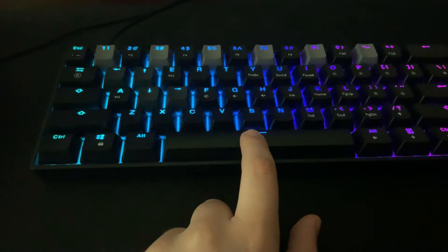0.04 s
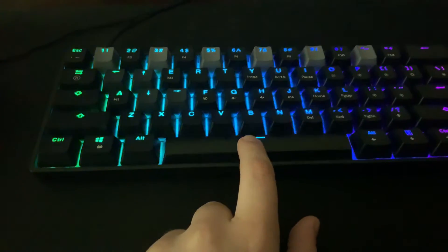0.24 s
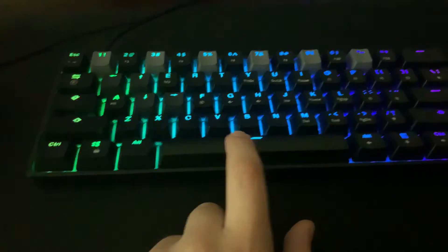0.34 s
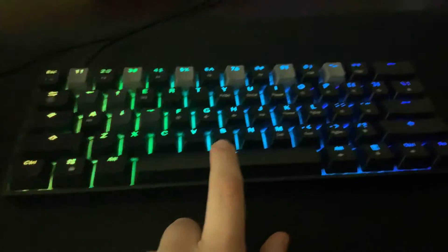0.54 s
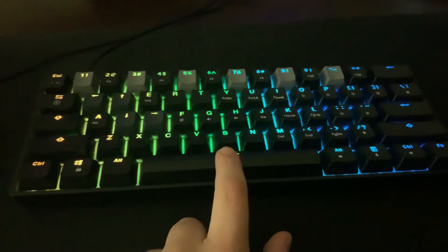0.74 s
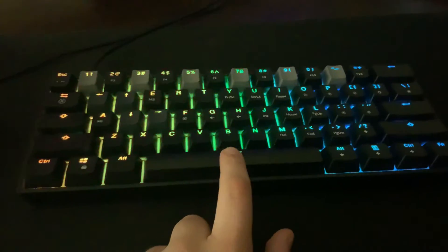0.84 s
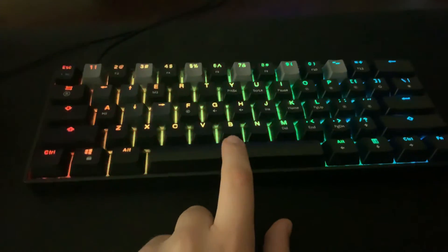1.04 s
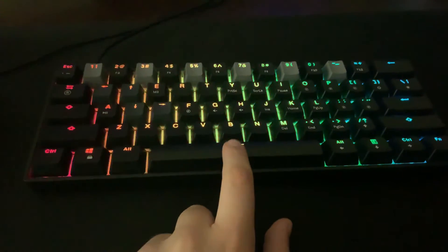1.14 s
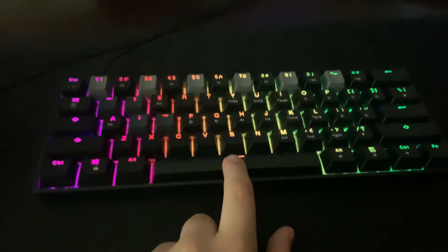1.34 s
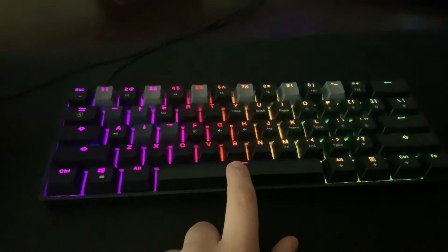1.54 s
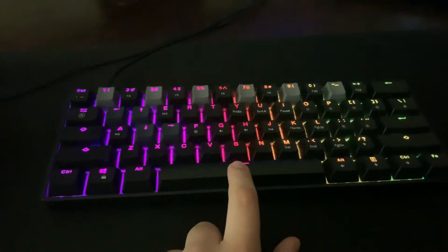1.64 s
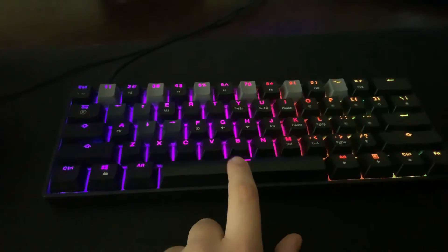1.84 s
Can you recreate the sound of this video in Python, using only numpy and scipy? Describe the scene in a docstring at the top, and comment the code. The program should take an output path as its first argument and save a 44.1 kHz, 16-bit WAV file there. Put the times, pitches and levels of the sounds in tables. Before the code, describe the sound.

Mechanical keyboard spacebar pressed and released twice, with sharp plastic clacks in a small room.

```python
"""The spacebar of a mechanical keyboard is pressed and let go twice, just after an earlier release.
Its stem slides faintly, then the plastic bar clacks against a stop and its steadying wire rattles.
The desk thumps underneath, and a small room with soft fan air and a low hum answers.
Between the two strokes comes a faint rustle."""
import sys
import numpy as np
from scipy import signal
from scipy.fft import rfft, irfft, next_fast_len
from scipy.io import wavfile
from scipy.ndimage import map_coordinates

SR = 44100
rng = np.random.default_rng(int(sys.argv[2]) if len(sys.argv) > 2 else 0)


def wrap_up_sound(samples):
    """Save the sound to the file named by the first command line argument, as 16-bit audio."""
    columns = np.atleast_2d(samples).T
    # keep every value between -1 and 1, then stretch to whole-number steps
    tamed = np.clip(columns, -1, 1)
    steps = np.round(tamed * 32767).astype(np.int16)
    wavfile.write(sys.argv[1], SR, steps)


N = 83790
LEAD_S = .1  # tracks start this early, so a sound before time 0 can ring on into the scene


def amp(db):
    return 10 ** (np.asarray(db) / 20)


def unit(x):
    return x / np.sqrt(np.mean(x ** 2) + 1e-20)


def along(points, hz):
    """Read between the rows of a (frequency, value) table, on a log frequency scale."""
    freqs, values = np.transpose(points)
    return np.interp(np.log(hz + 1), np.log(freqs + 1), values)


def filtered(x, gain):
    """Scale each frequency in x by gain(hz)."""
    size = next_fast_len(len(x) + SR // 4)
    return irfft(rfft(x, size) * gain(np.fft.rfftfreq(size, 1 / SR)), size)[:len(x)]


def noise(colour, size):
    """Noise of strength 1; its colour says how strong the frequencies are next to each other."""
    return unit(filtered(rng.standard_normal(size), lambda hz: amp(along(colour, hz))))


def fading_noise(colour, fades):
    """Half a second of noise; each frequency has its own fade, the time it takes to drop 60 dB."""
    hz, t, spectrum = signal.stft(noise(colour, SR // 2), SR, nperseg=128)
    spectrum = spectrum * amp(-60 * t / along(fades, hz)[:, None])
    return signal.istft(spectrum, SR, nperseg=128)[1][:SR // 2]


def ring(hz, fade_s, t):
    """One fading tone."""
    return np.sin(2 * np.pi * hz * t) * amp(-60 * t / fade_s)


def add(track, start, sound):
    """Mix a sound in at a start time in seconds."""
    part = track[round((start + LEAD_S) * SR):][:len(sound)]
    part += sound[:len(part)]


# how long the plastic clacks: f/Hz, fade t/s
CLACK_FADES = [(600, 0.055), (2000, 0.042), (5000, 0.062), (14000, 0.037)]
# colour of the click: f/Hz, level/dB
CLICK_COLOUR = [(500, -45), (2000, 22), (4500, 8.5), (6500, 0), (10000, 6), (12500, 2), (14700, 10.5),
                (16000, -3.5)]

def contact(colour, clack_db, click_db, t):
    """Hard parts meet: a sharp click, then the short clack of the plastic."""
    clack_rise_s, click_rise_s, click_fade_s = .0003, .0015, .0039
    clack = fading_noise(colour, CLACK_FADES) * (1 - np.exp(-t / clack_rise_s))
    click = noise(CLICK_COLOUR, len(t)) * np.minimum(t / click_rise_s, 1)
    click *= amp(-60 * np.maximum(t - click_rise_s, 0) / click_fade_s)
    return amp(clack_db) * clack + amp(click_db) * click


# the bar hits the bottom: t/s, clack level/dB, ring level/dB, click level/dB, brightness/dB per octave
PRESSES = [(.2027, -28, -33, -27, -1.5), (1.3037, -32, -36, -31.5, -3)]
# the bar springs back up and may bounce: same columns
RELEASES = [(-.023, -23.5, -32, -24, 0.5), (.3065, -23, -27.5, -25.5, 0), (.3188, -23, -31, -27, 2),
            (1.4507, -31, -34.5, -32.5, 0.5)]
# colour of the clack going down and coming up: f/Hz, level/dB
PRESS_COLOUR = [(200, -35), (470, -24.5), (570, -3), (1000, 2), (1700, 4), (2250, -12), (3400, -1.5),
                (3900, -16.5), (4450, -9), (6500, -21.5), (10000, -15.5), (12500, -22), (14800, -12.5),
                (16000, -19)]
RELEASE_COLOUR = [(200, 8.5), (470, -31), (560, 0.5), (1000, 6), (1700, 3), (2400, 0), (3450, -4.5),
                  (3800, -12.5), (6500, -16), (10000, -20), (12500, -21), (14800, -19), (16000, -10.5)]
# tones of the bar and case: f/Hz, press level/dB, release level/dB
BAR_TONES = [(578, -2, -2.5), (649, 2.5, 3.5), (789, -3, -13), (892, -13, -18.5), (984, -2, -5.5),
             (1150, -4, -11), (1430, -6, -2), (1549, -2.5, -7.5), (1658, -3, -2), (1824, -8, -4.5),
             (2275, -1, -4.5), (2739, -4, -5), (3002, -2, -11), (3347, -2.5, -8)]
# how long they ring: f/Hz, fade t/s
BAR_FADES = [(600, .038), (1000, .05), (1600, .058), (3400, .045)]

def bar_hits(t):
    """The bar hits its bottom or top stop; both set the same tones ringing, in a different mix."""
    track = np.zeros(N + SR)
    rise = 1 - np.exp(-t / .0005)
    for side, (hits, colour) in enumerate([(PRESSES, PRESS_COLOUR), (RELEASES, RELEASE_COLOUR)]):
        for start, clack_db, ring_db, click_db, brightness in hits:
            tones = np.zeros(len(t))
            for hz, *levels in BAR_TONES:
                gain = amp(levels[side] + brightness * np.log2(hz / 1000))
                tones += rng.choice([-1, 1]) * gain * ring(hz, along(BAR_FADES, hz), t)
            add(track, start, contact(colour, clack_db, click_db, t) + amp(ring_db) * tones * rise)
    return track


# colour of the room's echo: f/Hz, level/dB
ECHO_COLOUR = [(300, 8), (630, -7), (1000, -1), (1600, 1), (3000, -4), (7000, -3.5), (11000, -3),
               (15000, -0.5)]
# how long it lasts: f/Hz, fade t/s
ECHO_FADES = [(200, .4), (500, 0.5), (1000, 0.26), (3000, 0.3), (7000, 0.24), (15000, 0.25)]

def room_echo(sound, t):
    """The walls of a small room smear a sound into a short tail."""
    rise = 1 - np.exp(-(t / .0017) ** 2)
    tail = fading_noise(ECHO_COLOUR, ECHO_FADES) * rise
    return signal.fftconvolve(sound, tail / np.linalg.norm(tail))[:len(sound)]


# each press or release shakes the desk: t/s, thump level/dB, room boom level/dB
THUMPS = [(-.018, -37.5, -52.5), (0.203, -45.5, -53.5), (0.311, -36.5, -50), (1.303, -50, -55.5),
          (1.454, -39.5, -56)]
# tones of the desk: f/Hz, relative level/dB, fade t/s
DESK_TONES = [(89.5, 6.5, 0.071), (99.14, -13, 0.18)]
# colour of the rumble: f/Hz, level/dB
RUMBLE_COLOUR = [(60, -39), (110, -3), (155, -3.5), (210, -4.5), (325, -7.5), (400, -17), (500, -17),
                 (700, -40)]
# how long it lasts: f/Hz, fade t/s
RUMBLE_FADES = [(100, 0.54), (330, 0.31)]

def desk_thumps(t):
    """The case knocks on the desk, which swells into a thump; a room boom and a low rumble follow."""
    track = np.zeros(N + SR)
    desk_rise_s, boom_rise_s = .035, .09
    knock = amp(-18) * ring(hz=322, fade_s=.24, t=t)
    swell = 1 - np.exp(-(t / desk_rise_s) ** 3)
    thump = sum(amp(db) * ring(hz, fade_s, t) for hz, db, fade_s in DESK_TONES) * swell
    thump /= abs(thump).max()
    boom = ring(hz=258.4, fade_s=.14, t=t) * (1 - np.exp(-(t / boom_rise_s) ** 3))
    boom /= abs(boom).max()
    for start, thump_db, boom_db in THUMPS:
        rumble = amp(-13.5) * fading_noise(RUMBLE_COLOUR, RUMBLE_FADES) * swell
        add(track, start, amp(thump_db) * (thump + knock + rumble) + amp(boom_db) * boom)
    return track


def wobble(rate):
    """A smooth curve through `rate` random points a second."""
    points = rng.standard_normal(int(N * rate / SR) + 4)
    return map_coordinates(points, [np.arange(N) * rate / SR])


# tones of the hum: f/Hz, level/dB, waver (0 is steady)
HUM_TONES = [(48.6, -66.5, 0), (101, -67, 0.54), (191.8, -76, 0.3), (2816, -79.5, 0)]
# colour of the fan's air: f/Hz, level/dB
AIR_COLOUR = [(20, -34), (33, -33), (45, -13.5), (60, -3.5), (100, -28), (140, -8.5), (200, -13.5),
              (300, -15.5), (420, -21), (620, -17), (900, -16), (1500, -18.5), (2850, -22), (3300, -33),
              (4000, -38), (7000, -43), (11500, -43), (14500, -33.5), (16000, -45.5)]

def fan_and_hum():
    """Soft fan air with a wavering hum."""
    t = np.arange(N) / SR
    hum = np.zeros(N)
    for hz, db, waver in HUM_TONES:
        drift = 1 + waver * (wobble(9) + 1j * wobble(8.5))  # sways both loudness and pitch
        hum += amp(db) * unit(np.real(drift * np.exp(2j * np.pi * hz * t)))
    return amp(-64) * noise(AIR_COLOUR, N) + hum


# light taps of wire and cap: t/s, clack level/dB, click level/dB
RATTLES = [(.097, -50, -60), (0.135, -60.5, -80), (.186, -46, -54), (0.3081, -27.5, -18.5),
           (.3106, -24.5, -38), (.3201, -32, -28), (1.1918, -63, -81), (1.2965, -66, -57),
           (1.3115, -44, -43), (1.4517, -43, -32), (1.4607, -35, -40.5), (1.464, -57, -43)]

def wire_rattles(t):
    """The wire that keeps the bar level taps against the plastic cap."""
    track = np.zeros(N + SR)
    for start, clack_db, click_db in RATTLES:
        add(track, start, contact(RELEASE_COLOUR, clack_db, click_db, t))
    return track


# the stem slides: t/s, length t/s, level/dB
SLIDES = [(0.174, 0.023, -55.5), (0.295, 0.012, -59), (1.283, 0.025, -59.5)]
# colour of the rubbing: f/Hz, level/dB
SLIDE_COLOUR = [(300, -46), (900, -5), (1800, 9), (3300, 4.5), (5000, -11), (9500, -14), (15500, -21)]

def stem_slides(t):
    """The stem under the key rubs along its housing with a brief hiss."""
    track = np.zeros(N + SR)
    rise_s, fall_s = .0013, .0059
    for start, length, db in SLIDES:
        shape = np.clip(t / rise_s, 0, 1) * np.clip((length - t) / fall_s + 1, 0, 1)
        add(track, start, amp(db) * shape * noise(SLIDE_COLOUR, len(t)))
    return track


# colour of the rustle: f/Hz, level/dB
RUSTLE_COLOUR = [(1500, -17), (5000, 0.5), (8000, -7.5), (15000, -1.5)]

def rustle():
    """A faint, brief rustle while the finger rests."""
    t = np.arange(N) / SR
    peak_s, width_s = .98, .07
    return amp(-76) * noise(RUSTLE_COLOUR, N) * np.exp(-((t - peak_s) / width_s) ** 2)


def scene():
    """Key, desk and room together."""
    t = np.arange(SR // 2) / SR  # seconds since a single sound began
    bass_cut = signal.butter(N=5, Wn=470, btype="high", fs=SR, output="sos")
    key = signal.sosfilt(bass_cut, bar_hits(t) + wire_rattles(t) + stem_slides(t))
    strokes = key + amp(-11.5) * room_echo(key, t) + desk_thumps(t)
    strokes = strokes[round(LEAD_S * SR):][:N]
    return (strokes + fan_and_hum() + rustle())[None]


def record(dry):
    """Cut away the very highest treble."""
    top_hz = 16000
    return filtered(dry[0], lambda hz: 1 / (1 + (hz / top_hz) ** 120))[None]


dry = scene()
out = record(dry)
wrap_up_sound(out)
```